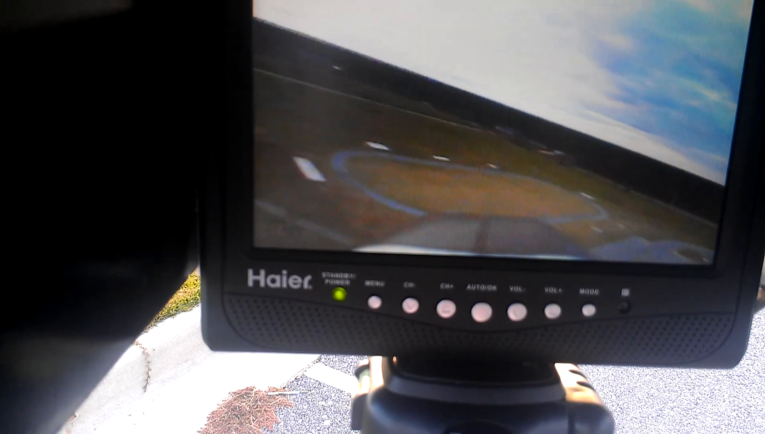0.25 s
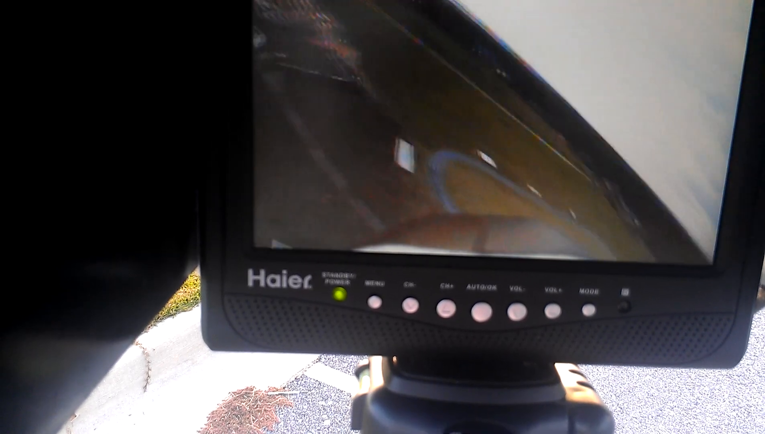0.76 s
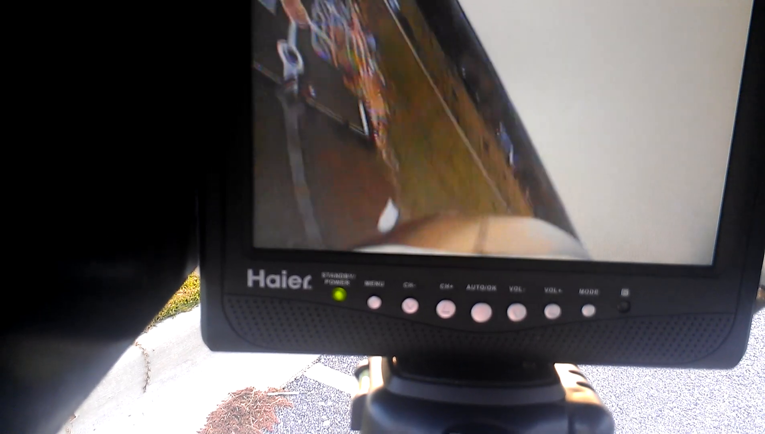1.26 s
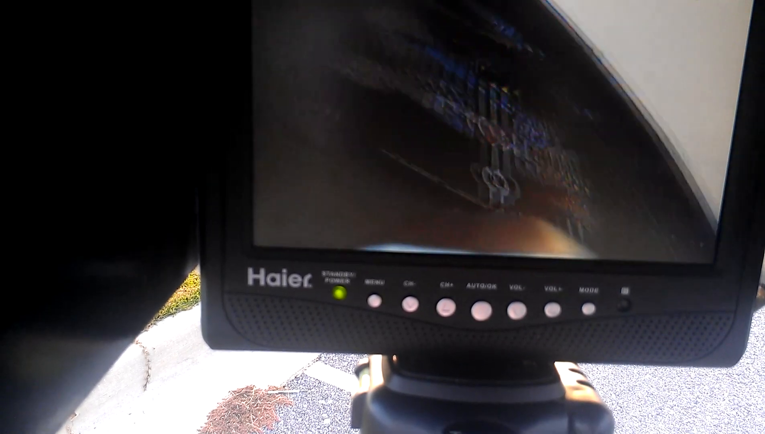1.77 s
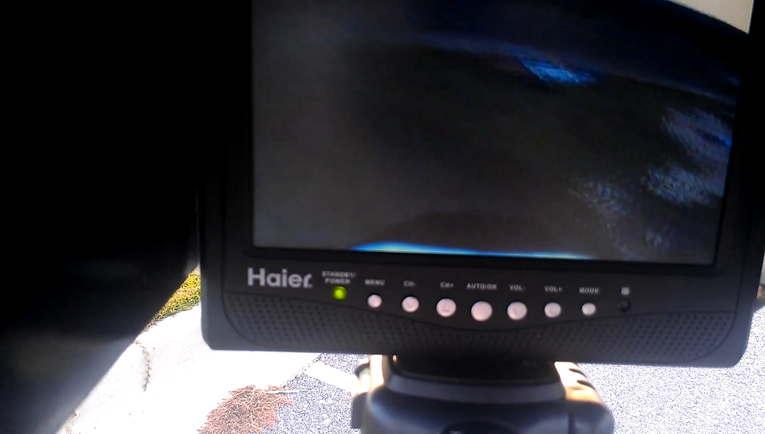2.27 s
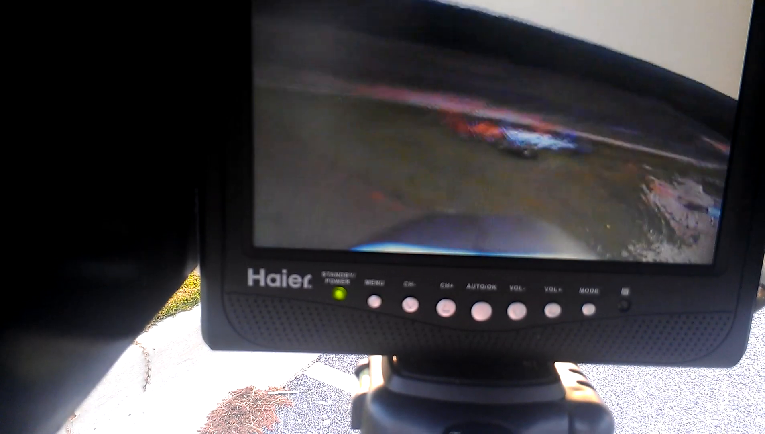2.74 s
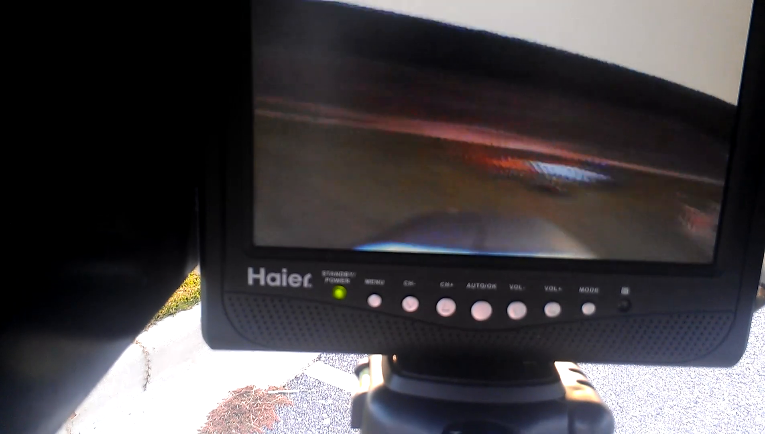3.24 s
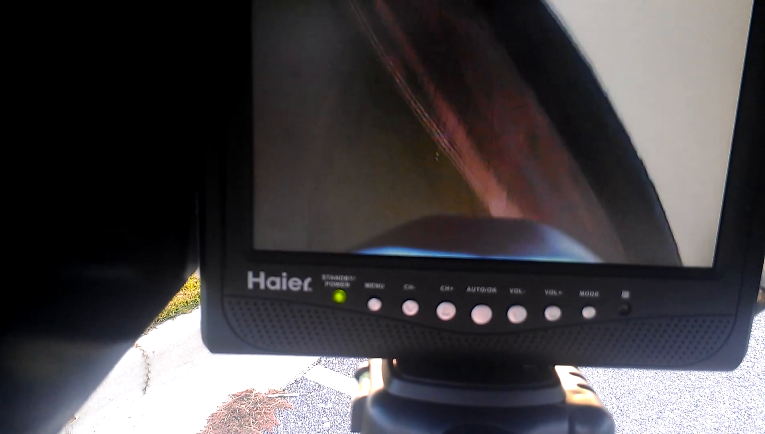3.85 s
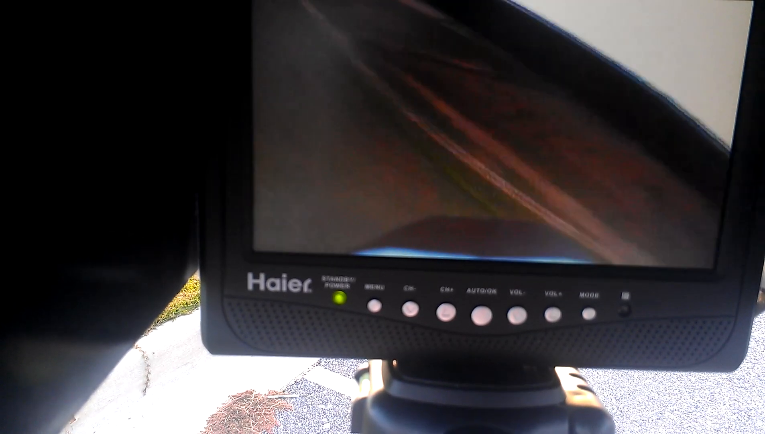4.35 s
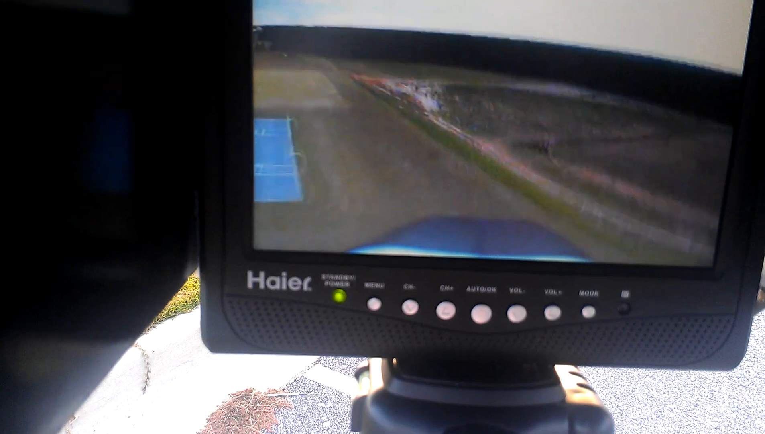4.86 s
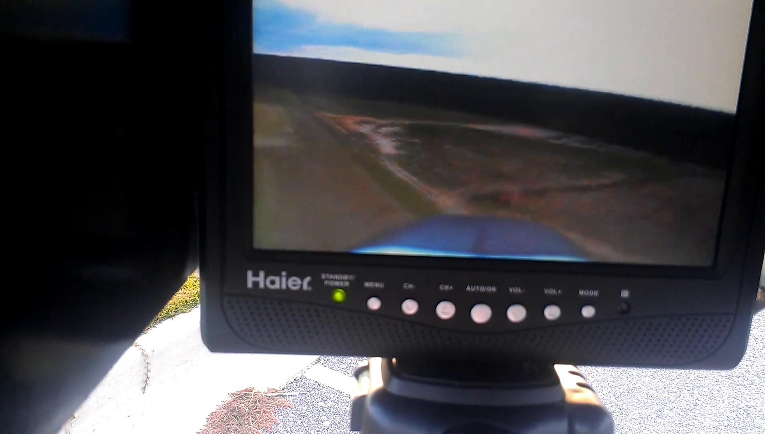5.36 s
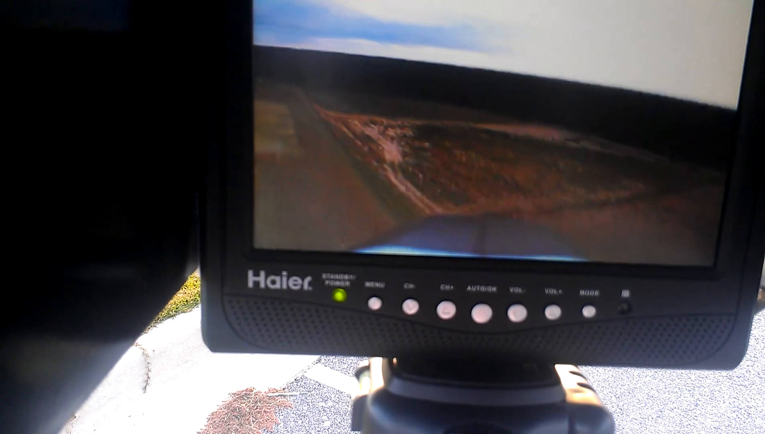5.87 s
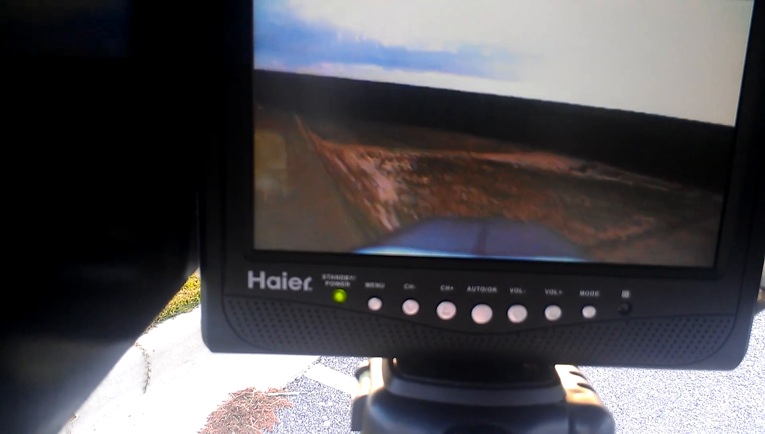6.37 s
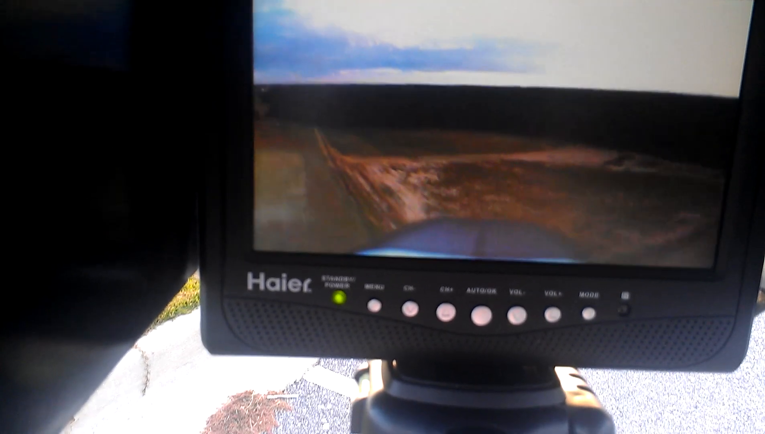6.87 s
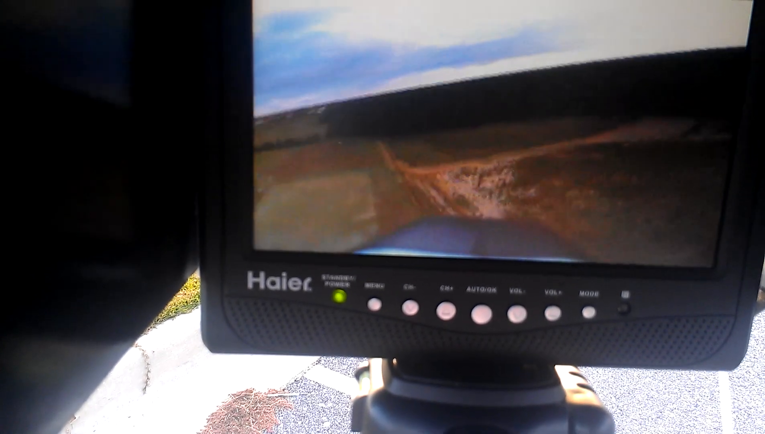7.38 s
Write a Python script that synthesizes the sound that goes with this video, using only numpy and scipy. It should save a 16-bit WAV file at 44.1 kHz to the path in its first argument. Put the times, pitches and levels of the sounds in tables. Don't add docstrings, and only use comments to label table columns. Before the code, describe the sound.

A small electric model plane's buzzy whine through a tinny speaker cuts out, coasts down breathily, then climbs back in steps to a steady full-throttle drone.

```python
import sys
import numpy as np
from scipy import signal
from scipy.fft import rfft, irfft, next_fast_len
from scipy.io import wavfile
from scipy.ndimage import uniform_filter1d, map_coordinates

SR = 44100
rng = np.random.default_rng(int(sys.argv[2]) if len(sys.argv) > 2 else 0)


def generate_wav(signal):
    frames = np.transpose(np.atleast_2d(signal))
    scaled = np.clip(frames, -1, 1) * 32767
    pcm = np.round(scaled).astype(np.int16)
    wavfile.write(sys.argv[1], SR, pcm)


def gain_from_db(level_db):
    decades = np.asarray(level_db, float) / 20
    return 10 ** decades


N = 336042

# start_s, blade_pass_hz
PROPELLER_SPEED = [(0, 515.3), (.952, 515.4), (1.2, 305), (1.3, 250), (1.58, 170), (2.2, 200), (2.3, 245),
                   (2.5, 280), (2.6, 320), (2.72, 339), (3.0, 367), (3.22, 413), (3.38, 431), (3.73, 444),
                   (3.885, 516.6), (4.8, 515.8), (6.2, 515.0), (7.62, 514.0)]
FULL_HZ, INERTIA_S = 515.5, .035
POWER_OFF_S, POWER_ON_S = 1.27, 2.26
# shaft_order, level_db over the propeller hiss
SHAFT_ORDERS = [(2, -14.5), (3, -26), (4, -17), (5, -23), (6, -12.5), (8, -11), (10, -15), (12, -18),
                (14, -25), (16, -13.5), (18, -14), (20, -20.5), (22, -15.5), (24, -42)]
# blade_pass_hz, tone_db over the hiss
BLADE_SINGING = [(246, -58), (276, 4), (305, 6), (380, -1), (440, 2.5), (515, 1)]
# pitch_hz, gain_db
FUSELAGE_GAIN = [(400, 0), (870, 4.5), (1030, -5), (1300, 2), (2130, 0), (2260, -9), (4950, -8), (5120, 0),
                 (7000, 0)]
HISS_DB, HISS_POWER = -25.5, 2.82
STRAIN_DB, STRAIN_HZ_PER_S = 1.5, 1270
# blade_pass_hz, whistle_db
CHOPPING = [(240, -9), (365, -10), (444, -16), (510, -32), (515, -38)]
WHISTLE_HZ, EARLY_WHISTLE_DB = 7817.6, -3.5
SLOTS = 42
# blade_pass_hz, level_db over the hiss
WINDING_RATTLE = [(250, 2), (370, -2), (410, 4), (445, -1.5), (500, 4), (515, -10.5)]
CAN_HZ, CAN_WIDTH_HZ = 5940, 1800
# start_s, slipstream_db, buffeting_db
AIRFLOW_LEVELS = [(0, -35, -2.5), (.5, -33.5, -4.5), (.96, -40.5, -2), (1.12, -32, 0), (1.5, -47.5, 16.5),
                  (1.92, -35, 8.5), (2.24, -40.5, -1), (2.6, -36.5, -6.5), (2.9, -39.5, 9.5),
                  (3.3, -32.5, -3.5), (3.84, -33, -5), (4.02, -44, -1.5), (4.2, -32.5, 0.5),
                  (5.0, -29.5, -0.5), (5.8, -29, -1.5), (6.6, -33, -0.5), (7.15, -30.5, 3.5),
                  (7.62, -30.5, -2.5)]
# centre_s, length_ms, gain_db
LONG_CHOKES = [(7.096, 20, -8.5), (0.485, 15, -17), (0.606, 9.6, -14.5), (1.047, 18, -3), (6.87, 57, -1),
               (1.516, 32, -5.5), (1.581, 19, -21), (1.786, 25, -22), (7.465, 34, -6), (2.213, 51, -11),
               (2.252, 21, -27), (2.36, 32, -18), (2.443, 8.2, -13), (2.485, 35, -35), (2.599, 34, -25),
               (2.935, 26, -16), (2.961, 22, -17), (3.587, 12, -14), (3.707, 10.4, -10), (4.563, 17, -8.5),
               (4.013, 73, -2.5), (4.39, 110, -3), (5.462, 41, -5), (5.545, 14, -8), (5.723, 16.5, -40),
               (6.915, 12, -40), (7.073, 12, -23), (7.377, 15.5, -23), (7.405, 29.5, -32), (7.431, 30, -29)]
# centre_s, gain_db
STOP_FLICKS = [(6.932, -20), (.499, -34), (0.527, -8), (0.87, -12), (1.028, -5), (1.393, -9), (1.41, -12),
               (1.556, -23), (1.678, -15), (1.712, -21), (2.8, -7), (2.982, -12), (3.569, -20),
               (3.602, -22), (3.625, -14), (4.148, -34), (4.271, -29), (4.411, -13), (4.581, -11),
               (7.449, -31), (5.683, -30), (5.704, -34), (5.76, -13), (5.922, -10), (6.326, -18),
               (6.631, -46), (6.973, -38), (7.161, -13), (7.357, -18), (1.143, -12)]
FLICK_MS = 7.6
# centre_s, length_ms, gain_db
BUFFETING_LULLS = [(.517, 9.8, 1), (0.909, 44, 2), (1.245, 13, 0), (1.336, 7, 14.5), (1.357, 11, 8.5),
                   (1.432, 20, 4.5), (1.503, 14, 7.5), (1.532, 16, 6), (1.597, 13, 5), (1.7, 4.6, 4.5),
                   (.57, 37, 1.5), (2.041, 5.8, 4.5), (2.122, 12, 2.5), (2.286, 18, 2), (4.293, 52, 2.5),
                   (4.341, 26, 3.5), (4.619, 51, 5), (4.758, 32, 2), (5.566, 42, 1.5), (5.697, 5.1, 3.5),
                   (6.087, 11, 5), (6.473, 31, 2.5), (6.591, 34, 4), (6.794, 64, 3), (7.008, 15, 4),
                   (2.455, 14, 5.5), (2.677, 10, 2.5), (3.614, 25, 2.5), (3.86, 82, 1), (1.063, 5.7, 6)]
SWAY_DB, SWAY_PER_S = 1.71, 16
REBOUND_DB, REBOUND_S = 1, 0.034
SNAP = 9
# pitch_hz, width_hz, level_db, polarity
CONE_RESONANCES = [(658, 219, -19.5, 1), (819, 221, -12.5, 1), (892, 866, -16.5, -1), (1392, 240, -15, 1),
                   (1874, 160.6, -8, -1), (2032.7, 115, -5.5, 1), (2602, 49.3, -15, -1),
                   (2786, 273, -20, 1), (3273, 93, -21, -1), (3714, 434, -22.5, 1), (4326, 105, -19.5, -1),
                   (4580, 49, -24, 1), (4933, 113, -13, -1), (5240, 63, -16, 1), (5413, 61, -19, -1),
                   (5705, 50, -10, -1), (5985, 285, -9.5, 1), (6217, 288, -14, -1), (6880, 63, -36, -1),
                   (7647, 263, -30, 1), (8450, 230, -31.5, -1), (9340, 220, -50, 1), (11160, 1100, -44, 1),
                   (12480, 370, -43, -1)]
NARROWEST_HZ = 135
# start_s, pitch_hz, level_db
EDGE_WHISTLE = [
    (1.86, 3900, -58),
    (1.98, 4040, -43),
    (2.04, 4180, -38),
    (2.1, 4380, -41.5),
    (2.16, 4200, -44),
    (2.24, 4400, -57),
]
# start_s, peak_db, pitch_hz
EDGE_TICKS = [
    (2.0413, -23, 4260),
    (2.1201, -20, 4180),
]
# start_s, pitch_hz, level_db
FAR_DRONE = [
    (0, 515, -50),
    (.95, 515, -64),
    (1.0, 500, -92),
    (3.7, 480, -101),
    (3.9, 518, -49),
    (4.6, 527, -50.5),
    (6, 528, -44),
    (7.62, 528, -43.5),
]
# pitch_hz, level_db per Hz
OPEN_GROUND = [(82, -69), (140, -13), (223, -14.5), (762, 3.5), (1310, -6), (1970, -14), (3020, -19.5),
               (5800, -15), (6860, -28), (12000, -34.5), (15600, -75), (22000, -120)]
# start_s, level_db, pitch_hz
STAND_BUMPS = [
    (.55, -54, 720),
    (2.045, -37, 340),
    (2.83, -38.5, 463),
    (4.3, -23, 990),
]
HUM_HZ = 231


def unit(x):
    return x / np.sqrt(np.mean(x ** 2) + 1e-20)


def curves(rows):
    s, *cols = np.transpose(rows)
    return [np.interp(np.arange(N) / SR, s, c) for c in cols]


def along(points, hz):
    f, db = np.transpose(points)
    return gain_from_db(np.interp(np.log(hz), np.log(f), db))


def wobble(rate):
    return map_coordinates(rng.standard_normal(int(N * rate / SR) + 4), [np.arange(N) * rate / SR])


def tone(hz):
    return np.sin(2 * np.pi * (np.cumsum(hz * np.ones(N)) / SR + rng.random()))


def filtered(x, response):
    m = next_fast_len(N + SR // 2)
    return irfft(rfft(x, m) * response(np.fft.rfftfreq(m, 1 / SR) + 1e-3), m)[:N]


def noise(response):
    return filtered(rng.standard_normal(N), response)


def speed():
    return uniform_filter1d(curves(PROPELLER_SPEED)[0], round(INERTIA_S * SR), mode="nearest")


def hiss_level(blade_hz):
    change = uniform_filter1d(np.abs(np.gradient(blade_hz)) * SR, SR // 10)
    strain_db = STRAIN_DB * np.tanh(change / STRAIN_HZ_PER_S)
    return HISS_DB + 20 * HISS_POWER * np.log10(blade_hz / FULL_HZ) + strain_db


def propeller_tones(blade_hz, shaft):
    orders = np.zeros(N)
    for k, db in SHAFT_ORDERS:
        level = gain_from_db(db + 1.67 * wobble(6.4))
        orders += level * np.sin(2 * np.pi * (round(k) * shaft + rng.random()))
    orders = filtered(orders, lambda f: along(FUSELAGE_GAIN, f))
    whine = gain_from_db(-4) * tone(SLOTS * blade_hz / 2)
    return orders + filtered(whine, lambda f: 1 / (1 + (8350 / f) ** 60) / (1 + (f / 9300) ** 14))


def motor_drive(blade_hz):
    t = np.arange(N) / SR
    powered = (t < POWER_OFF_S) | (t > POWER_ON_S)
    whistle_db = np.interp(blade_hz, *np.transpose(CHOPPING)) + EARLY_WHISTLE_DB * (t < POWER_OFF_S)
    sizzle = noise(lambda f: 1 / (1 + (7000 / f) ** 12) / (1 + (f / 9200) ** 16))
    controller = gain_from_db(whistle_db + 20.5) * (tone(WHISTLE_HZ) + 1.1 * sizzle)
    can = noise(lambda f: 1 / (1 + ((f - CAN_HZ) / CAN_WIDTH_HZ) ** 4))
    rattle = gain_from_db(np.interp(blade_hz, *np.transpose(WINDING_RATTLE))) * can
    return powered * (controller + rattle)


def plane():
    blade_hz = speed()
    shaft = np.cumsum(blade_hz / 2 * (1 + .0002 * wobble(25))) / SR
    split = lambda f: 1 / (1 + (f / 1700) ** 4)
    stream = noise(split) * gain_from_db(curves(AIRFLOW_LEVELS)[0] + 29.5)
    blade_pulse = 1 + 0.63 * np.cos(4 * np.pi * shaft)
    hiss = noise(lambda f: 1 - split(f)) * blade_pulse
    singing = gain_from_db(np.interp(blade_hz, *np.transpose(BLADE_SINGING)))
    tones = singing * propeller_tones(blade_hz, shaft)
    return stream + gain_from_db(hiss_level(blade_hz) + 18) * (hiss + tones + motor_drive(blade_hz))


def choking():
    buffet = unit(noise(lambda f: 1 / (1 + (f / 32) ** 1.3) / (1 + (f / 600) ** 4) * (f > 10)))
    t = np.arange(-SR // 20, SR // 20) / SR
    padded = np.zeros(N + 2 * len(t))
    flicks = [(s, FLICK_MS, db) for s, db in STOP_FLICKS]
    for s, ms, db in LONG_CHOKES + BUFFETING_LULLS + flicks:
        half_s = ms / 2000
        u = t / half_s
        steepness = np.where((u > 0) == (db < 0), SNAP, 4)
        shape = np.exp(-np.abs(u) ** steepness)
        rebound = REBOUND_DB * np.exp(-np.abs(t - half_s) / REBOUND_S)
        rebound = (db < 0) * (u > 1) * (1 - shape) * rebound
        padded[round(s * SR) + len(t) // 2:][:len(t)] += db * shape + rebound
    marked_db = padded[len(t):][:N]
    push = gain_from_db(curves(AIRFLOW_LEVELS)[1] - 2 * np.maximum(marked_db, 0)) * buffet
    restless = 1 / (1 + np.abs(push / 1.25) ** 5) + .13
    return 1.033 * restless * gain_from_db(marked_db + SWAY_DB * wobble(SWAY_PER_S))


def rasp():
    level = gain_from_db(hiss_level(speed()) + 3.5 + 1.2 * wobble(72))
    return level * noise(lambda f: 1 + 0.74 / (1 + (6500 / f) ** 8) / (1 + (f / 9200) ** 10))


def speaker(x):
    modes = np.maximum(CONE_RESONANCES, [0, NARROWEST_HZ, -99, -1])

    def response(f):
        cone = 0
        for c, w, db, polarity in modes:
            cone = cone + np.sign(polarity) * gain_from_db(db) * 1j * f * w / (c * c - f * f + 1j * f * w)
        bass_cut = (1j * f / 500 / (1 + 1j * f / 500)) ** 3
        return cone * bass_cut * 2

    return filtered(x, response)


def edge():
    hz, db = curves(EDGE_WHISTLE)
    first_s, last_s = EDGE_WHISTLE[0][0], EDGE_WHISTLE[-1][0]
    sounding = np.abs(np.arange(N) / SR - (first_s + last_s) / 2) < (last_s - first_s) / 2
    rush = unit(noise(lambda f: 1 / (1 + ((f - 4200) / 600) ** 2)))
    whistle = gain_from_db(4 * wobble(70) - 3) * tone(hz * (1 + .018 * wobble(120)))
    out = sounding * gain_from_db(db - 2) * (whistle + .8 * rush)
    t = np.arange(SR // 40) / SR
    for s, peak_db, tick_hz in EDGE_TICKS:
        envelope = gain_from_db(peak_db - 60 * t / 0.0094) * (1 - np.exp(-t / 0.00079))
        out[round(s * SR):][:len(t)] += envelope * 1.6 * np.sin(2 * np.pi * tick_hz * t)
    return out


def ground():
    murmur = unit(noise(lambda f: along(OPEN_GROUND, f)))
    drone_hz, drone_db = curves(FAR_DRONE)
    out = gain_from_db(-45 + 0.97 * wobble(1.8)) * murmur
    out += gain_from_db(-65 + 4.2 * wobble(24)) * tone(HUM_HZ * (1 + 0.006 * wobble(2.3)))
    out += gain_from_db(drone_db + 1.0 + 1.5 * wobble(6.3)) * tone(drone_hz * (1 + 0.00289 * wobble(18)))
    t = np.arange(SR // 8) / SR
    for s, db, hz in STAND_BUMPS:
        ring = sum(a * np.sin(2 * np.pi * ratio * hz * t) for ratio, a in ((1, 1), (1.5, 0.73), (1.1, 1.6)))
        envelope = gain_from_db(db - 60 * t / 0.023) * (1 - np.exp(-t / 0.00071))
        out[round(s * SR):][:len(t)] += envelope * ring
    return out


def scene():
    return (speaker(choking() * plane() + rasp()) + edge() + ground())[None]


def starved(x):
    z = signal.stft(x, nperseg=2048)[2]
    frames = z.shape[1]
    power = np.abs(z[:1024]) ** 2
    band = power.reshape(128, 8, -1).mean(axis=1)
    band[:2] = gain_from_db(-6) * power[6:16].mean(axis=0)
    wide = band[40:].reshape(22, 4, -1).mean(axis=1)
    band[40:] = gain_from_db(-3.5) * np.repeat(wide, 4, axis=0)
    luck_db = 2.5 * rng.standard_normal(frames)
    luck_db = luck_db + 2.2 * np.repeat(rng.standard_normal((32, frames)), 4, axis=0)
    luck_db[:3] = 2.5 * uniform_filter1d(luck_db[:3], 6, axis=1)
    whole = power.sum(axis=0)
    keep = band > whole ** .85 * whole.mean() ** .15 * gain_from_db(2 * (-58.7 + luck_db))
    bins = np.repeat(keep, 8, axis=0)[np.minimum(np.arange(1025), 1023)]
    return signal.istft(z * bins, nperseg=2048)[1][:N]


def roll_off(x):
    return signal.sosfilt(signal.butter(12, 12410, fs=SR, output="sos"), x)


def record(dry):
    cut = filtered(dry[0], lambda f: (1j * f / 190 / (1 + 1j * f / 190)) ** 4)
    mix = starved(cut)[None]
    return roll_off(mix)


dry = scene()
out = record(dry)
generate_wav(out)
```